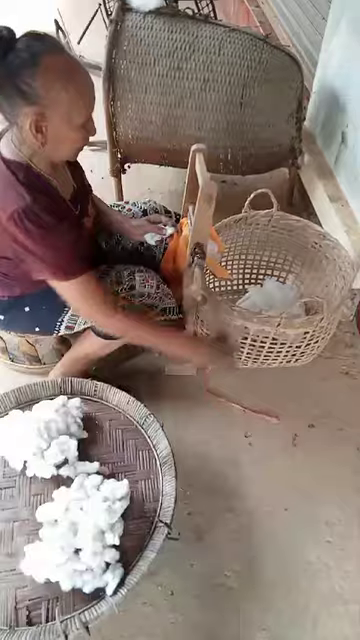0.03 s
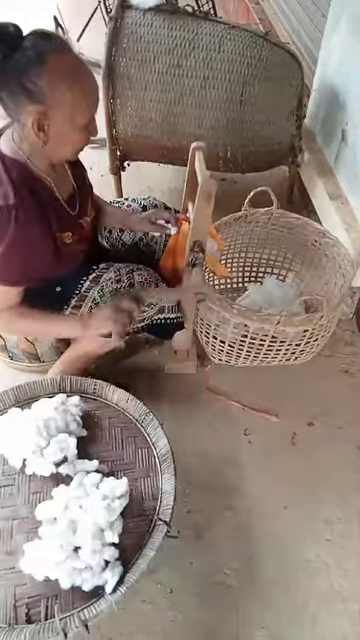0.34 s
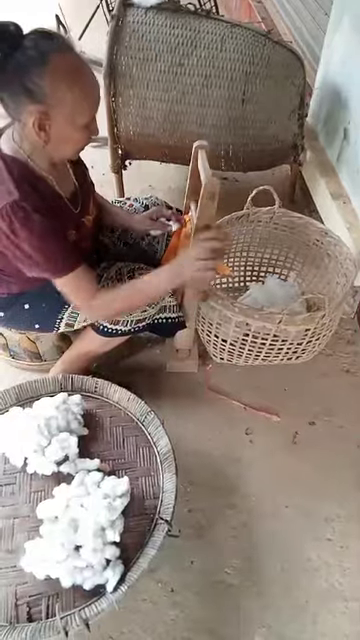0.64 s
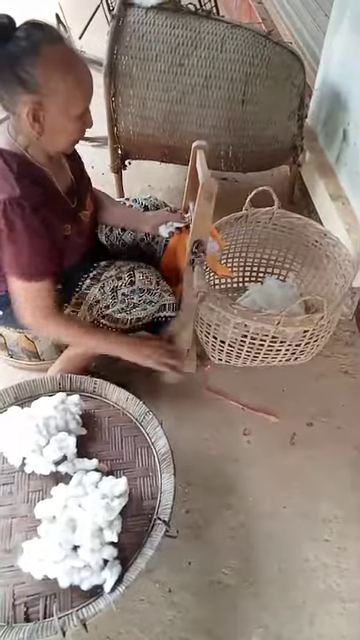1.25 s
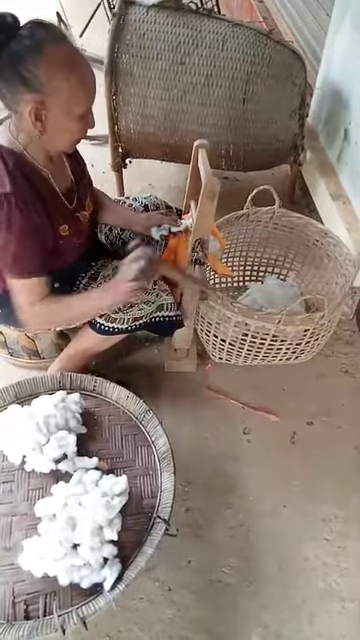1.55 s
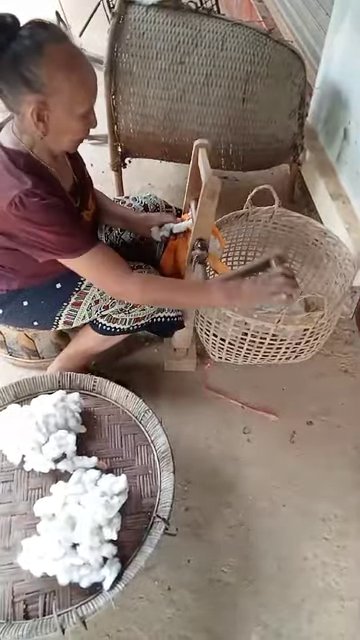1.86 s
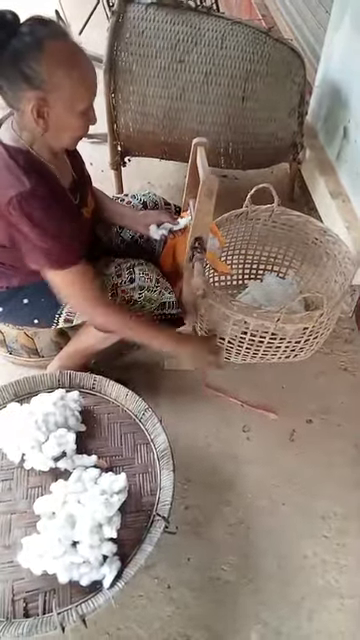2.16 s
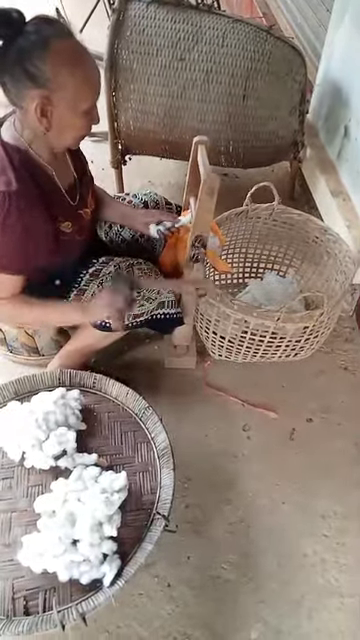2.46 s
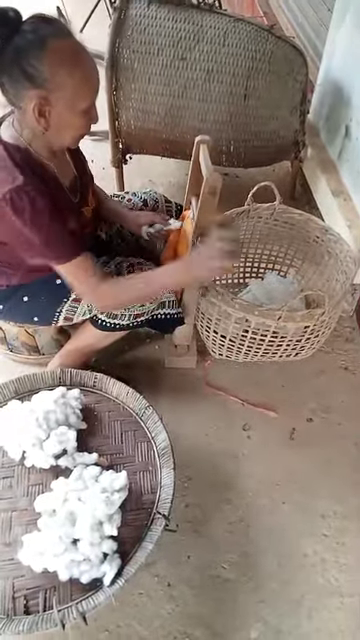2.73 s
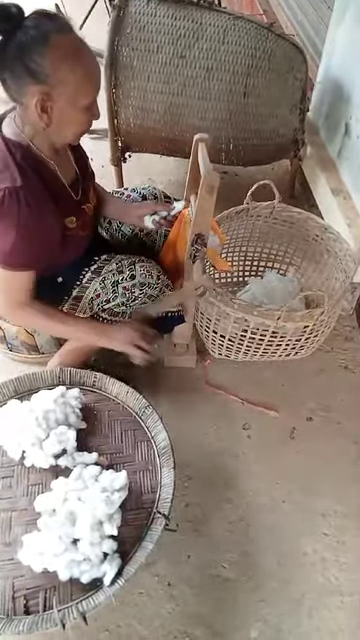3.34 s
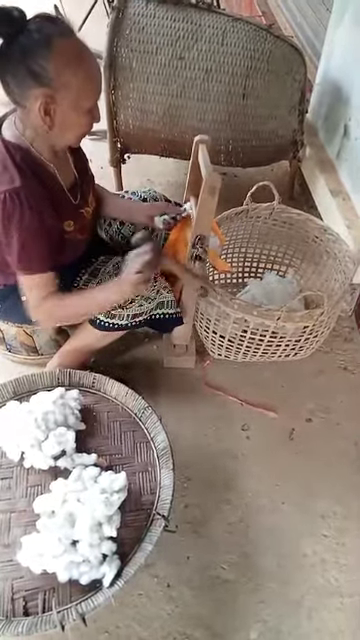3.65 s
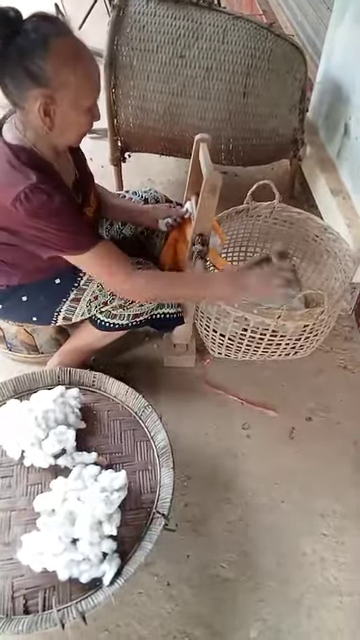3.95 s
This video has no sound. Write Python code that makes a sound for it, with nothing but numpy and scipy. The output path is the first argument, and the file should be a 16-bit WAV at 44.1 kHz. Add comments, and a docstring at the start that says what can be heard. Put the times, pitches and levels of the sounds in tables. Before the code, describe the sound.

Wooden rollers rasp in uneven bursts as a cotton gin is cranked about once a second. Small squeaks and cracks break through while the dry axle groans softly, with a brief echo from the small, quiet space.

```python
"""The rollers of a wooden cotton gin rasp by stick-slip friction, cranked by hand about once a second.
Each turn gives a long rasp as the handle rises, a shorter rub as it falls, a brief catch at the bottom.
The slips are impulses that excite the resonances of the frame, with squeaks and cracks among them.
The dry axle groans along in harmonics of the slip rate, sinking in pitch under load.
The small, quiet space reverberates briefly over a faint steady background."""
import sys
import numpy as np
from scipy import signal
from scipy.fft import rfft, irfft
from scipy.io import wavfile
from scipy.ndimage import uniform_filter1d

SR = 44100
rng = np.random.default_rng(int(sys.argv[2]) if len(sys.argv) > 2 else 0)


def persist_wave(psi):
    """Save psi, clipped to +-1, as 16-bit WAV."""
    counts = np.round(np.clip(psi, -1, 1) * 32767).astype(np.int16)
    wavfile.write(sys.argv[1], SR, np.atleast_2d(counts).T)


N = 176400
T = np.arange(N) / SR
HZ = np.fft.rfftfreq(N, 1 / SR)


# Squeal resonance of the rollers: t/s, f/Hz
SQUEAL_PITCH = [(.4, 3440), (.5, 3680), (.6, 3230), (.65, 3030), (.74, 3070), (.79, 2842), (.9, 3662),
                (1.5, 3699), (1.57, 4151), (1.68, 3354), (1.8, 3797), (2.42, 3795), (2.5, 3410),
                (2.6, 4074), (3.05, 3555), (3.5, 3249), (3.59, 3850), (3.66, 3879), (3.71, 3313),
                (3.78, 2953), (3.85, 3687), (3.9, 3400)]
def rollers(drive, squeal_share=0.6):
    """Source and filter: slips excite the frame and a gliding squeal; pressure sets each band's level."""
    wood = frame(drive)
    bite, body, treble = pressure_envelopes()
    squeal = unit(resonate(wood, np.interp(T, *np.transpose(SQUEAL_PITCH)), width_hz=1480))
    bite_band = unit((1 - squeal_share) * band(wood, 2316, 5900) + squeal_share * squeal)
    body_band = amp(-1) * band(wood, 558, 1997) + amp(-14) * band(wood, 203, 439)
    treble_band = band(wood, 6340, 21400)
    return amp(-0.58) * bite * bite_band + body * body_band + amp(-0.5) * treble * treble_band


# Four rasps of the rising handle, the third in two lists around a brief break:
# t/s, then relative level/dB of bite, body, treble
RISING_RASPS = [
    [(0.257, -36, -40.5, -40.5), (0.333, -32, -40, -35), (0.389, -32.5, -35, -42.5),
     (0.505, -20, -34, -25.5), (0.548, -27.5, -37, -33), (0.596, -22.5, -35, -25.5),
     (0.666, -24.5, -29.5, -32), (0.688, -31.5, -34.5, -42.5), (0.738, -21, -29.5, -33),
     (0.795, -27.5, -32, -41.5), (0.83, -43, -43, -47)],
    [(1.459, -40, -44, -48), (1.497, -25, -34, -32.5), (1.55, -30, -45, -40), (1.63, -40, -42, -42.5),
     (1.655, -19, -34, -26.5), (1.71, -25.5, -30, -33), (1.767, -35, -36, -43), (1.797, -20.5, -34, -29),
     (1.83, -41, -40.5, -57)],
    [(2.318, -35.5, -35, -40.5), (2.338, -22.5, -25.5, -30), (2.39, -31, -34.5, -35),
     (2.438, -30.5, -38.5, -32.5), (2.476, -34, -37.5, -43), (2.494, -23.5, -33.5, -32),
     (2.61, -24, -37.5, -31), (2.655, -48, -61, -97)],
    [(2.685, -29, -42, -35.5), (2.707, -29.5, -31, -38.5), (2.749, -33.5, -31, -33.5),
     (2.759, -50, -37, -55), (2.781, -38, -34, -44), (2.821, -23, -33, -30.5), (2.85, -44, -55, -62)],
    [(3.304, -27, -31, -31.5), (3.322, -33, -30, -43), (3.332, -21.5, -28, -32), (3.405, -33.5, -37, -36.5),
     (3.44, -38, -44, -30.5), (3.482, -27.5, -45, -43), (3.504, -23.5, -32, -33.5),
     (3.575, -22, -34.5, -29.5), (3.644, -20.5, -30, -23.5), (3.772, -21, -32, -28.5),
     (3.84, -28, -28, -33.5), (3.885, -20, -27, -30), (3.93, -25, -30.5, -35), (3.96, -45, -60, -69)],
]
# Rubs of the falling handle: same columns
FALLING_RUBS = [
    [(0.886, -33.5, -35, -41.5), (0.966, -19, -26.5, -27), (1.0, -36, -48, -42)],
    [(1.943, -26.5, -38.5, -38.5), (1.987, -21, -24, -26), (2.075, -24.5, -40, -30)],
    [(2.961, -32, -40, -39.5), (3.013, -21.5, -25, -25.5), (3.085, -27.5, -40, -32.5)],
]
# A faint fading tail as the sound opens, then brief catches:
# t/s, duration/s, first and last bite level/dB, body and treble level/dB re bite
TAIL_AND_CATCHES = [(0.083, 0.053, -41, -49.5, -5.5, -11), (1.136, 0.014, -30, -27, -11, -14.5),
                    (1.151, 0.034, -21, -26, -5.5, -9), (1.326, 0.054, -28.5, -36.5, -3, -4),
                    (2.181, 0.014, -31, -23, -6, -11.5), (3.175, 0.02, -26, -27.5, -6, -12.5)]
def pressure_envelopes(attack_s=0.0035, release_s=0.0029):
    """Friction noise follows contact pressure: gains of bite (upper mids), body and treble."""
    short_spells = [[(start, first, first + body, first + treble),
                     (start + length, last, last + body, last + treble)]
                    for start, length, first, last, body, treble in TAIL_AND_CATCHES]
    gains = np.zeros((3, N))
    for spell in list(RISING_RASPS) + list(FALLING_RUBS) + short_spells:
        times, *levels = np.transpose(spell)
        attack = np.clip((T - times[0]) / attack_s + 1, 0, 1)
        release = np.exp(-np.maximum(T - times[-1], 0) / release_s)
        gains = np.maximum(gains, [attack * release * amp(np.interp(T, times, db)) for db in levels])
    return gains


def slips(rate, speed_up_s=.06, weak_slip_db=-11, fade_s=0.0023, crackles_per_s=700):
    """Relaxation oscillation: strong and weak slips alternate, snapping and scraping; fibres crackle."""
    slowed_rate = rate * (1 - .33 * np.exp(-rub_age() / speed_up_s))
    slip_count = np.floor(np.cumsum(slowed_rate) / SR)
    slip_db = weak_slip_db * (slip_count % 2) + np.clip(rng.standard_normal(N), -2, 2)
    snaps = (np.diff(slip_count, prepend=0) > 0) * amp(slip_db)
    sliding = unit(signal.lfilter([1], [1, -np.exp(-1 / (fade_s * SR))], snaps))
    scrape = unit((0.41 + sliding) * rng.standard_normal(N))
    crackle = unit((rng.random(N) < crackles_per_s / SR) * rng.uniform(-0.65, 1, N))
    return 0.65 * unit(snaps) + 0.96 * scrape + 0.32 * crackle


def stutter(jerks_per_s=115, quickening_per_s2=250, depth_db=8, fade_s=.055, spurt_s=.006):
    """Amplitude modulation: a stroke starts in jerks that quicken and fade, leaving uneven spurts."""
    age = rub_age()
    jerks = jerks_per_s * age + quickening_per_s2 * age ** 2 / 2
    sawtooth = 0.3955 - jerks % 1
    knots = np.arange(0, T[-1] + spurt_s, spurt_s)
    spurts = np.interp(T, knots, np.clip(rng.standard_normal(N)[:len(knots)], -2, 2))
    return amp(depth_db * np.exp(-age / fade_s) * sawtooth + 0.64 * spurts)


def rub_age():
    """Clock of the starting transient: seconds since a rasp or rub last began or resumed."""
    age = T.copy()
    for start in sorted(rows[0][0] for rows in list(RISING_RASPS) + list(FALLING_RUBS)):
        age = np.where(T >= start, T - start, age)
    return age


# Broad response of the wood: f/Hz, level/dB
WOOD_RESPONSE = [(150, -24.5), (300, -0.5), (450, -11.5), (750, -19), (1000, -10.5), (1400, -11.5),
                 (1900, -9.5), (2300, -9.5), (3000, -5.5), (3700, -3), (4600, -5), (5600, -7.5),
                 (7200, -13), (9200, -9.5), (10300, -14.5), (11500, -23.5), (13000, -27.5), (15500, -32.5)]
# Modes of the frame: f/Hz, bandwidth/Hz, level/dB re broad response
FRAME_MODES = [(992, 12, -10.5), (1840, 28, -1.5), (1860, 14, -18), (5384, 77, -7.5), (6530, 15, -12)]
def frame(drive):
    """Modal resonance: narrow, damped modes ring on top of the wood's broad response."""
    ring = 1 + sum(amp(db) / (1 + 2j * (HZ - hz) / width) for hz, width, db in FRAME_MODES)
    return irfft(rfft(drive) * ring * amp(read(WOOD_RESPONSE, HZ)), N)


def smear(x, patterns=12, fade_s=0.0042, cutoff_hz=1240):
    """Convolution: each snap's highs are smeared by changing noise patterns, so no steady ring forms."""
    t = T[:SR // 25]
    taps = rng.standard_normal((patterns, len(t))) * np.exp(-t / fade_s) * (t > .0003)
    taps /= np.linalg.norm(taps, axis=1, keepdims=True)
    taps = signal.sosfilt(signal.butter(2, cutoff_hz, "high", fs=SR, output="sos"), taps)
    smeared = signal.fftconvolve(x * crossfade(patterns), taps, axes=1).sum(0)[:N]
    return unit(x + amp(0.5) * smeared)


# Squeaks where the wood grips hardest: peak t/s, 1/e half-duration/s, f/Hz, level/dB
GRIP_SQUEAKS = [(0.322, 0.0056, 3530, -23.5), (0.616, 0.024, 3160, -25), (0.97, 0.0061, 4410, -28),
                (1.154, 0.0035, 5200, -20), (1.795, .016, 3830, -30), (2.031, .012, 3629, -22),
                (2.052, 0.012, 5400, -18), (2.425, .014, 3748, -27.5), (2.816, 0.015, 4090, -33),
                (3.044, 0.013, 3600, -20.5), (3.06, 0.0058, 5304, -17), (3.433, 0.012, 3698, -23.5)]
def squeaks(drive, width_hz=570, upper_ratio=1.27):
    """Forced resonance: in short swells the slips ring one high mode and a weaker one above it."""
    out, t = np.zeros(N), T[:SR // 10]
    for peak, half, hz, db in GRIP_SQUEAKS:
        at = round((peak - t.mean()) * SR)
        span, pitch = slice(at, at + len(t)), np.full(len(t), float(hz))
        lower = unit(resonate(drive[span], pitch, width_hz))
        upper = unit(resonate(drive[span], upper_ratio * pitch, 2 * width_hz))
        swell = np.exp(-((t - t.mean()) / half) ** 2)
        out[span] += amp(db) * swell * (lower + amp(-4.5) * upper)
    return out


# Single hard slips: t/s, level/dB
HARD_SLIPS = [(0.945, -25), (1.088, -42.5), (1.639, -28), (1.7244, -19), (2.019, -23), (2.494, -16.5),
              (2.771, -23), (3.328, -16.5), (3.498, -18)]
def cracks(fade_s=0.0049):
    """Transient excitation: each hard slip drives the frame with an exponentially decaying noise burst."""
    envelope = sum(amp(db) * (T >= start) * np.exp(-abs(T - start) / fade_s) for start, db in HARD_SLIPS)
    bursts = frame(envelope * rng.standard_normal(N))
    return np.sqrt(np.mean(envelope ** 2)) * band(bursts, 1241, 18070)


# Axle groans: t/s, duration/s, first f/Hz, last f/Hz, level/dB, overtone level/dB re fundamental
AXLE_GROANS = [(0.28, .11, 334.8, 333.5, -38.5, -9), (0.404, 0.1, 342.9, 303, -47.5, 12.5),
               (0.509, .17, 336.2, 283.6, -36.5, 4.5), (0.941, 0.064, 285.5, 308.7, -43, 2.5),
               (1.136, 0.055, 338, 323.1, -41, -1.5), (1.354, 0.046, 337.7, 383.4, -36.5, -4),
               (1.418, 0.065, 377.8, 354.7, -46.5, -12), (1.527, 0.12, 361.7, 338.3, -35.5, 0),
               (1.64, 0.1, 334.6, 281.7, -37, 4.5), (1.783, 0.066, 312.3, 356, -45, -12),
               (2.003, 0.075, 280.7, 350.1, -39, -2), (2.17, 0.048, 318.4, 316.4, -40.5, -9),
               (2.385, 0.096, 343.6, 331.1, -36, -5), (2.506, 0.064, 341.7, 334.8, -41, 9.5),
               (2.573, 0.076, 322.6, 332.4, -36.5, -1), (2.662, 0.062, 371.5, 295.8, -38.5, -16),
               (2.764, 0.089, 296.3, 347.1, -38, -9), (3.034, 0.053, 313.6, 330.3, -38.5, 0),
               (3.164, 0.045, 313.2, 302.9, -41, -3), (3.349, 0.051, 396.6, 370, -39, -4),
               (3.393, 0.14, 341.7, 312.9, -33, -1), (3.623, .15, 328.4, 282.2, -36, 7),
               (3.781, 0.11, 272.7, 244.4, -51, 16)]
# Spectral envelope of the overtones: f/Hz, level/dB
GROAN_SPECTRUM = [(600, -11.5), (860, 1), (1000, 7.5), (1300, -3), (1800, 3.5), (2400, -12), (3200, -4),
                  (4400, 7.5), (5500, -26)]
def axle(rate, flutter=0.39):
    """Harmonic series: periodic slipping sounds a low tone with fluttering overtones, in swells."""
    out, phase = np.zeros(N), 2 * np.pi * np.cumsum(rate) / SR
    overtones = np.zeros(N)
    for k in range(2, 18):
        gain = amp(read(GROAN_SPECTRUM, k * rate)) * (1 + flutter * wander(300))
        overtones += gain * np.cos(k * phase + 2 * np.pi * rng.random())
    for start, length, _, _, db, overtone_db in AXLE_GROANS:
        now = (T >= start) & (T < start + length)
        swell = abs(np.sin(np.pi * (T[now] - start) / length)) ** 0.46
        out[now] += amp(db) * swell * (unit(np.sin(phase[now])) + amp(overtone_db) * unit(overtones[now]))
    return out


def slip_rate(glide_power=1.4, jitter=.012):
    """Frequency modulation: the slips per second sink or climb through each groan and waver a little."""
    progress = np.linspace(0, 1, 8)
    times = np.concatenate([start + length * progress for start, length, *_ in AXLE_GROANS])
    hz = np.concatenate([first + (last - first) * progress ** glide_power
                         for _, _, first, last, *_ in AXLE_GROANS])
    return np.interp(T, np.maximum.accumulate(times), hz) * (1 + jitter * wander(130))


# Reverberation time of the space: f/Hz, T60/s
ROOM_T60 = [(150, 0.47), (500, 0.31), (1500, 0.26), (4000, 0.22), (9000, 0.18), (15000, 0.19)]
def room(x, count=6):
    """Diffuse reverberation: short tails crossfade to stay uncoloured; each band decays at its own rate."""
    noise = rng.standard_normal((count, SR // 2)) * (T[:SR // 2] > .002)
    hz, t, spectra = signal.stft(noise, SR, nperseg=256)
    decay = amp(-60 * t / read(ROOM_T60, hz)[:, None])
    tails = signal.istft(spectra * decay, SR, nperseg=256)[1]
    return signal.fftconvolve(x * crossfade(count), tails / np.linalg.norm(tails[0]), axes=1).sum(0)[:N]


# Spectral density of the still air: f/Hz, relative level/dB
AIR_SPECTRUM = [(25, -44), (60, -13.5), (100, -12), (150, 3), (200, -6.5), (330, -4.5), (1500, -13.5),
                (4000, -13), (9000, -24), (12000, -24.5), (16000, -36)]
def air(level_db=-53):
    """Stationary noise: a faint background, strongest in the bass."""
    return amp(level_db) * unit(irfft(rfft(rng.standard_normal(N)) * amp(read(AIR_SPECTRUM, HZ)), N))


def crossfade(count, cycles_per_s=0.94):
    """Equal-power crossfade: gains that cycle through count patterns, their squares summing to 1."""
    distance = (count * cycles_per_s * T - np.arange(count)[:, None] + count / 2) % count - count / 2
    return np.cos(np.pi / 2 * np.minimum(abs(distance), 1))


def resonate(x, hz, width_hz):
    """Tunable resonance: two stages in cascade, each width_hz wide, follow the curve hz."""
    carrier = np.exp(2j * np.pi * np.cumsum(hz) / SR)
    pole = np.exp(-np.pi * width_hz / SR)
    return (carrier * signal.sosfilt([[1 - pole, 0, 0, 1, -pole, 0]] * 2, x / carrier)).real


def band(x, lo_hz, hi_hz):
    """Band-pass filtering, scaled to rms 1."""
    return unit(signal.sosfilt(signal.butter(4, [lo_hz, hi_hz], "band", fs=SR, output="sos"), x))


def wander(samples):
    """Moving average of white noise: a smooth fluctuation of rms 1."""
    return unit(uniform_filter1d(rng.standard_normal(N), samples))


def read(points, hz):
    """Interpolation on a log-frequency axis."""
    f, value = np.transpose(points)
    return np.interp(np.log(hz + 1), np.log(f + 1), value)


def amp(db):
    """Decibels to amplitude ratio."""
    return 10 ** (np.asarray(db) / 20)


def unit(x):
    """Normalisation to rms 1."""
    return x / np.sqrt(np.mean(abs(x) ** 2) + 1e-20)


def scene():
    """Superposition: rollers and axle, sharing one slip rate, add to their reverberation and the air."""
    rate = slip_rate()
    drive = unit(smear(slips(rate)) * stutter())
    rasp = rollers(drive) + squeaks(drive) + cracks()
    groan = axle(rate)
    reverberation = room(amp(-6.5) * rasp + amp(-8.5) * groan)
    return (rasp + groan + reverberation + air())[None]


def record(dry, silence_s=.075, fade_in_s=0.0035, cutoff_hz=15700):
    """Gating and band limiting: the sound opens after a moment of silence, through a steep low-pass."""
    opened = dry * np.clip((T - silence_s) / fade_in_s, 0, 1)
    low_pass = signal.firwin(401, cutoff_hz, window=("kaiser", 9), fs=SR)
    return signal.oaconvolve(opened, low_pass[None], "same")


dry = scene()
out = record(dry)
persist_wave(out)
```